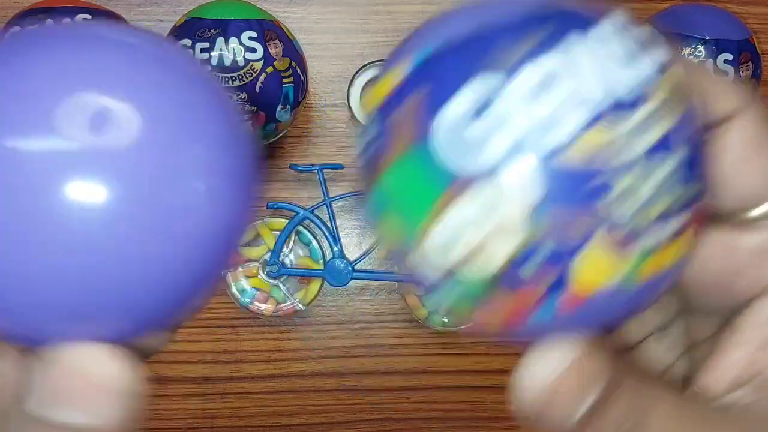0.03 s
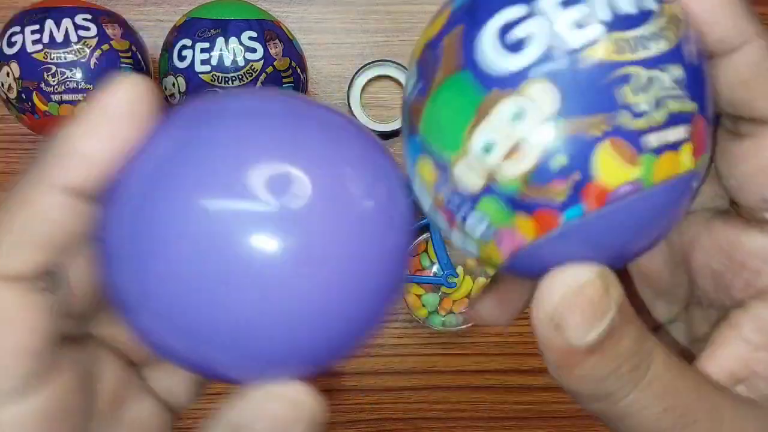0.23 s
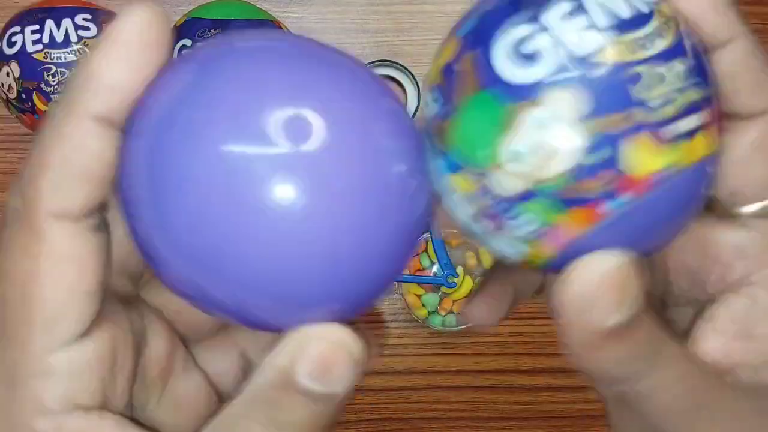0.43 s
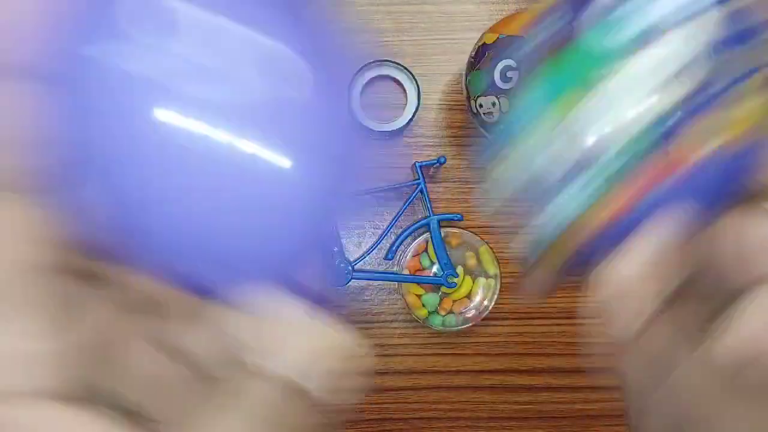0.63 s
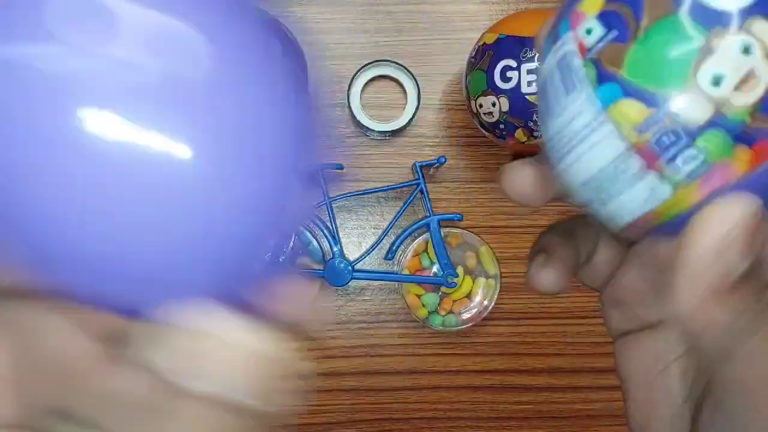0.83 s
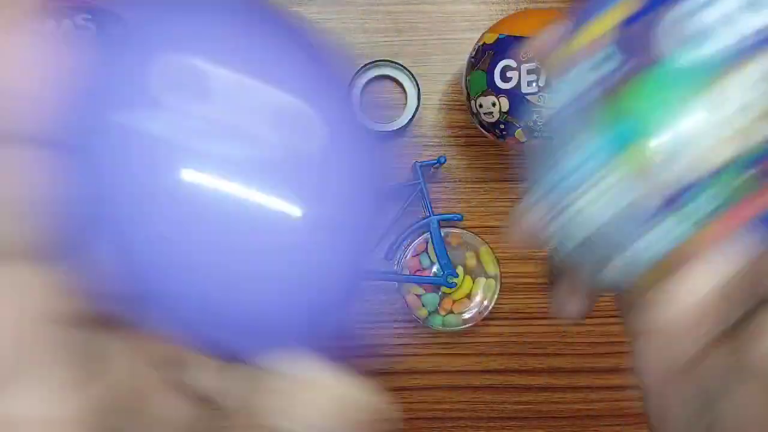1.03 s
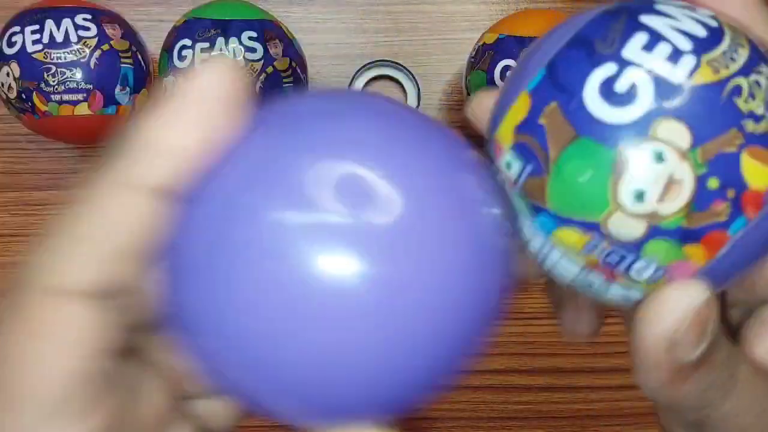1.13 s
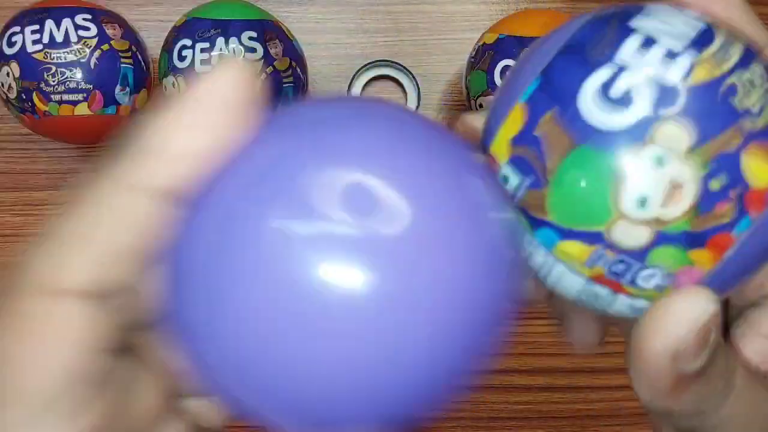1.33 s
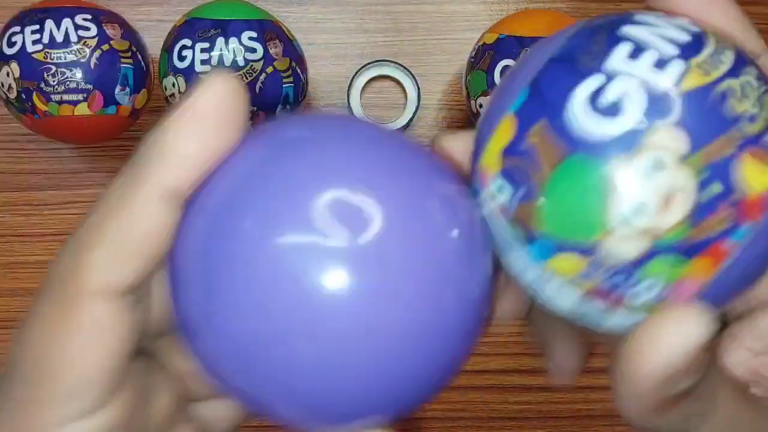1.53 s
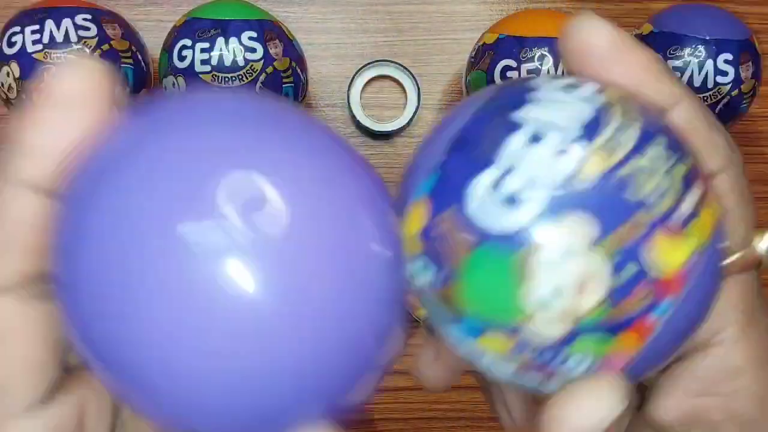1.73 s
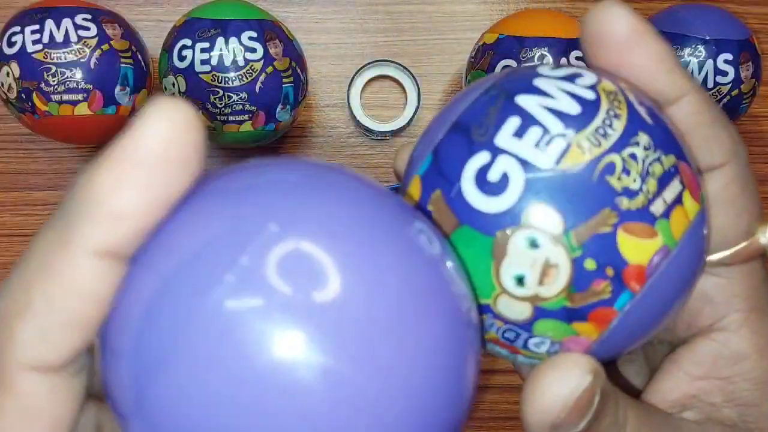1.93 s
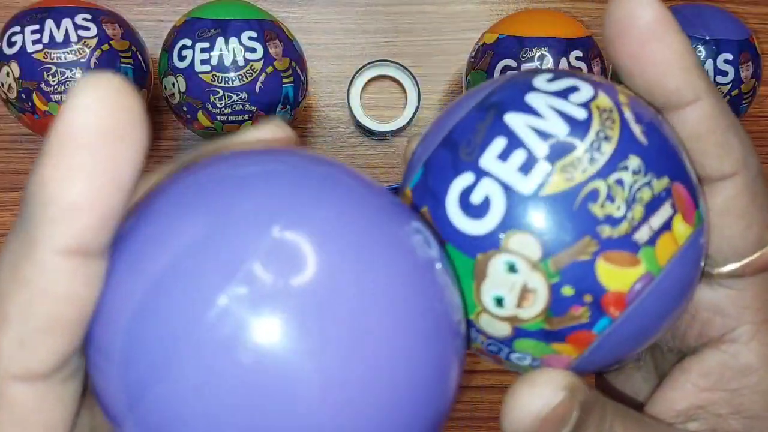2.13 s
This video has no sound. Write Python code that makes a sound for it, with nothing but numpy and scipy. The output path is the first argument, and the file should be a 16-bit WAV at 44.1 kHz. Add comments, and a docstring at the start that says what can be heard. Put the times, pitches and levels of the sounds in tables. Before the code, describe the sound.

Small candies rattle inside two hollow plastic balls shaken close to the microphone. The shaking starts lightly at about 0.2 seconds and keeps a quick, even pace for eight shakes, each a bright clatter against the shell followed by a hollow knock as the candies fall back. From about 1.9 seconds, single candies tick more and more faintly as they settle. The small quiet room adds a slight echo.

```python
"""Small candies rattle inside two hollow plastic balls, shaken eight times close to the microphone.
On each forward swing they spray against the shell, and every hit makes it ring briefly.
On the way back they land together with a knock and tumble to rest.
Single candies tick between the swings and at the end; a table top and a small quiet room echo it all."""
import sys
import numpy as np
from scipy import signal
from scipy.fft import rfft, irfft
from scipy.io import wavfile
from scipy.ndimage import uniform_filter1d

SR = 44100
rng = np.random.default_rng(int(sys.argv[2]) if len(sys.argv) > 2 else 0)


def wav_record(signal):
    """Record a signal, one row per channel, as 16-bit PCM in the file named by sys.argv[1]."""
    frames = np.transpose(np.atleast_2d(signal))
    bounded = np.clip(frames, -1, 1)
    # unit amplitude maps onto the largest positive 16-bit level
    quanta = np.round(bounded * 32767).astype(np.int16)
    wavfile.write(sys.argv[1], SR, quanta)


N = 97020


def shaken_candies(spots):
    """Candies spray forward, fall back, settle, and clink against each other."""
    # swings forward, swings back and small slides: start_s, peak_s, level_db, fade_db_per_s
    forward = [(0.224, 0.246, -27.5, 391.5), (0.434, 0.466, -16.5, 411.5), (0.672, 0.700, -15.5, 399.5),
               (0.897, 0.928, -14.5, 582), (1.116, 1.152, -14.5, 348), (1.332, 1.366, -14.5, 301),
               (1.531, 1.562, -16, 399), (1.768, 1.797, -17.5, 443.5)]
    back = [(0.286, 0.315, -17.5, 288.5), (0.521, 0.545, -20.5, 213.5), (0.746, 0.768, -20, 194),
            (0.965, 0.995, -18.5, 292.5), (1.179, 1.207, -21, 269), (1.390, 1.423, -17.5, 483),
            (1.604, 1.626, -18, 380.5), (1.827, 1.849, -18.5, 326.5)]
    settling = [(0.2, 0.216, -45.5, 392), (0.80, 0.822, -46, 503), (1.66, 1.68, -39.5, 408),
                (1.92, 1.933, -28, 399)]
    # tone of forward hits, backward hits and candy on candy: pitch_hz, level_db
    forward_tone = [(30, -39.5), (70, -36), (160, -16.5), (260, -13.5), (500, -13), (1000, -8), (1600, -5),
                    (2100, -1), (2600, 1), (4000, -0.5), (5500, -1.5), (7300, -13), (8700, -15.5),
                    (12000, -8), (15800, -29.5)]
    back_tone = [(30, -33), (60, -11), (120, -12), (250, -11.5), (500, -8.5), (1000, -6.5), (1700, -2.5),
                 (2200, -3.5), (2650, 0.5), (4000, 0), (5500, 1.5), (7500, -3), (8700, -12.5),
                 (12000, -9.5), (15800, -11)]
    clink_tone = [(1000, -30.5), (5000, -13), (7500, 1), (9000, -18), (12000, -10), (15500, -8)]
    return (spray(forward, spots, forward_tone, rise_db=13, thinning=0.41)
            + spray(back, spots, back_tone, rise_db=2.5, thinning=.3)
            + spray(settling, spots, back_tone, rise_db=5, thinning=1.0)
            + undb(-3) * spray(forward, spots, clink_tone, rise_db=12, thinning=1.0, hits_per_s=180))


def spray(swings, spots, colour, rise_db, thinning, hits_per_s=1200):
    """Clouds of candy hits build to a peak, then grow weaker, duller and sparser."""
    rest_db, dulling = -17, 0.79  # where a cloud stops; extra treble lost per dB below its peak
    t = np.arange(N) / SR
    body, treble = np.zeros((2, 2, N))
    for start, peak, db, fade in swings:
        jitter, place, side = rng.random((3, 400))
        strength = undb(4 * np.clip(rng.standard_normal(400), -2, 2))
        swell_db = np.where(t < peak, rise_db * (t - peak) / max(peak - start, .002), -fade * (t - peak))
        moving = (t >= start) & ((t < peak) | (swell_db > rest_db))
        rate = hits_per_s * undb(thinning * swell_db) * moving
        hits_so_far = np.cumsum(rate) / SR
        count = min(int(hits_so_far[-1]), len(strength))
        at = np.searchsorted(hits_so_far, np.arange(count) + jitter[:count])
        strength /= np.sqrt(np.mean(strength ** 2))
        gains = strength[:count] * undb(db + swell_db[at]) * np.sqrt(SR / rate[at])
        for i, gain, where, push in zip(at, gains, place, np.sign(side - .5)):
            hit = gain * push * spots[int(where * len(spots))]
            add(body, t[i], hit)
            add(treble, t[i], hit * undb(dulling * swell_db[i]))
    lowpass = signal.butter(1, 6700, fs=SR)  # lows come from body, highs from treble
    return convolve(treble + signal.lfilter(*lowpass, body - treble), tone(colour))


def shell_spots(count=48, size=2048):
    """Each spot on the shell gives a sharp click, its own ring and quick echoes off hands and table."""
    # the shell's ringing notes: pitch_hz, level_db, ring_s (time to fade by 60 dB)
    notes = [(1011, -32, 0.088), (1760, -14.5, .015), (2084, -13, 0.024), (2608, -2.5, 0.0126),
             (3260, -8.5, 0.0025), (3365, -13.5, 0.0173), (4475, -10, 0.015), (5225, 0.5, 0.0094),
             (6200, -11, 0.0052), (7220, 7, 0.012), (12270, 15, 0.0054)]
    t, freqs = np.arange(size) / SR, rfft_hz(size)
    spots = np.zeros((count, 2, size))
    spots[:, :, 0] = 1.6  # the click
    for hz, db, ring_s in notes:
        chance = rng.standard_normal((count, 4, 1))
        strength = chance[:, :1] + chance[:, 1:3]  # a shared part plus one for each ear
        spread = 0.081 * min(notes[3][2] / ring_s, 1) ** 2  # long notes vary less in pitch
        pitch = hz * (1 + spread * chance[:, 3:])
        spots += undb(db - 60 * t / ring_s) * strength * np.sin(2 * np.pi * pitch * t)
    spectrum = rfft(spots)
    power = np.mean(abs(spectrum) ** 2, axis=(0, 1))
    spectrum /= np.sqrt(uniform_filter1d(power, size=41))  # even out the overall tone
    right_lag_s = np.round((.0003 + .00005 * rng.uniform(-1, 1, (count, 1))) * SR) / SR
    spectrum[:, 1] *= np.exp(-2j * np.pi * freqs * right_lag_s)  # the left ear hears it first
    fade_out = np.cos(np.pi / 2 * t / t[-1]) ** 2
    spots = np.roll(irfft(spectrum), 24, axis=-1) * fade_out
    return [unit(unit(spot) + undb(-2) * tail(ring_s=0.017, size=size)) for spot in spots]


def knocks(spots):
    """The candies land in a lump: a crack, and a dull boom of the whole ball, damped by the hand."""
    # one landing on each swing back: time_s, boom_db, crack_db
    landings = [(0.2862, -4.5, -10.5), (0.521, -0.5, -9), (0.7465, -1, -2.5), (0.9655, -5, -3.5),
                (1.179, -4.5, -5.5), (1.390, -2.5, -15), (1.6043, 0.5, 3), (1.827, 1, 4.5)]
    # tone of the boom and of the crack: pitch_hz, level_db
    boom_tone = [(30, -7.5), (60, -15), (110, -8.5), (240, 1.5), (330, 0), (480, -14.5), (800, -9.5),
                 (2000, -17)]
    crack_tone = [(100, -11), (300, -1.5), (1000, 2.5), (2700, 4.5), (7000, -5.5), (9000, -9.5),
                  (16000, -16)]
    out = np.zeros((2, N))
    for spot, (at, boom_db, crack_db) in zip(spots, landings):
        middle, side = tail(ring_s=0.11)
        ring = middle + 0.22 * side * np.array([[1], [-1]])
        add(out, at, undb(boom_db - 1.5) * unit(convolve(ring, tone(boom_tone))))
        add(out, at, undb(crack_db + 7.5) * unit(convolve(spot, tone(crack_tone))))
    return out


def single_candies(spots):
    """Lone candies tick on the shell; harder contact gives more treble."""
    # lone hits: time_s, level_db, treble_db
    ticks = [(0.2182, -14.5, -4), (0.2331, -12.5, -31), (0.2458, -32, -14), (0.4288, -16, -41),
             (0.4393, -8.5, -28), (0.5954, -15, -20), (0.638, -18.5, -10), (0.6689, -12, -25),
             (0.6769, -6, -18), (0.8978, -8.5, -21.5), (1.0831, -12, -11), (1.1164, -16, -25),
             (1.3321, -19.5, -43), (1.5289, -21.5, -28), (1.7398, -18.5, -19), (1.7558, -18, -30),
             (1.7667, -14.5, -32), (1.778, -7, -16), (1.9333, -18.5, -23.5), (1.9646, -17.5, -28),
             (1.9952, -27.5, -17), (2.0456, -27, -38), (2.0627, -20, -13), (2.1164, -52.5, -28),
             (2.143, -31.5, -36), (2.1525, -40, -22), (2.175, -37, -42)]
    # tone of a typical tick: pitch_hz, level_db
    tick_tone = [(100, -44), (600, -36), (1400, -15), (2650, 0), (4000, -2), (7000, -9), (9000, -19),
                 (12000, -17), (16000, -27)]
    typical_treble_db = -13
    out = np.zeros((2, N))
    for k, (at, db, treble_db) in enumerate(ticks):
        tilt = [(3500, 0.0061), (10000, 0.73 * (treble_db - typical_treble_db))]
        colour = [(hz, level + on_log_axis(tilt, hz)) for hz, level in tick_tone]
        add(out, at, undb(db + 10.5) * unit(convolve(spots[k % len(spots)], tone(colour))))
    return out


def finger_bump():
    """A finger softly bumps the shell before the shaking."""
    # tone of the bump: pitch_hz, level_db
    bump_tone = [(30, -6), (60, 3), (130, 3), (250, -9.5), (500, -31), (1500, -34), (5000, -30),
                 (8000, -30), (16000, -48)]
    out = np.zeros((2, N))
    bump = unit(convolve(tail(ring_s=0.11), tone(bump_tone)))
    add(out, at_s=.122, sound=undb(-31) * bump)
    return out


def room_echo(sound, size=22050):
    """The small room gives a soft wash of echoes that dies sooner in the treble."""
    # time the room takes to fade by 60 dB: pitch_hz, ring_s
    ring_times = [(200, .28), (1400, .28), (3500, .3), (10000, .23), (16000, .16)]
    # tone of the echo: pitch_hz, level_db
    echo_tone = [(100, -4.5), (600, 0.5), (2700, -1), (7000, -0.5), (11000, 2.5), (16000, -0.5)]
    t = np.arange(size) / SR
    noise, echo = rfft(rng.standard_normal((2, size))), 0
    for band_hz, ring_s in ring_times:
        band = on_log_axis([(hz, hz == band_hz) for hz, _ in ring_times], rfft_hz(size))
        echo += irfft(noise * band) * undb(-60 * t / ring_s)
    fade_in = 1 - np.exp(-t / 0.0027)
    return convolve(convolve(sound, unit(echo * fade_in)), tone(echo_tone))


def background():
    """A steady low rumble with a little hiss."""
    # tone of the noise: pitch_hz, level_db
    noise_tone = [(30, -13), (60, -5), (130, -4), (300, -12.5), (700, -16), (2000, -26), (8000, -28),
                  (16000, -41)]
    return convolve(rng.standard_normal((2, N)), tone(noise_tone))


def undb(db):
    """Turn decibels into a gain."""
    return 10 ** (np.asarray(db) / 20)


def rfft_hz(size):
    """The pitch of each step in a spectrum."""
    return np.arange(size // 2 + 1) * SR / size


def on_log_axis(points, hz):
    """Read between (pitch_hz, value) points, giving each octave equal room."""
    pitches, values = np.array(points, float).T
    return np.interp(np.log(np.maximum(hz, 1)), np.log(pitches), values)


def unit(x):
    """Scale a sound so its channels have an average energy of one."""
    return x / np.sqrt(np.mean(np.sum(x ** 2, axis=-1)))


def convolve(x, response):
    """Pass a sound through a filter or an echo."""
    return signal.fftconvolve(np.atleast_2d(x), np.atleast_2d(response), axes=-1)[:, :N]


def tone(points, size=2048):
    """Make a filter with the shape of the (pitch_hz, level_db) points."""
    cepstrum = irfft(np.log(undb(on_log_axis(points, rfft_hz(size)))))
    cepstrum[1:size // 2] *= 2  # fold it so nothing sounds before the hit
    cepstrum[size // 2 + 1:] = 0
    return unit(irfft(np.exp(rfft(cepstrum))))


def tail(ring_s, size=8192):
    """Stereo noise that fades by 60 dB in ring_s."""
    return unit(rng.standard_normal((2, size)) * undb(-60 * np.arange(size) / SR / ring_s))


def add(out, at_s, sound):
    """Place a short sound at its time."""
    i = int(at_s * SR)
    out[:, i:i + sound.shape[1]] += sound[:, :N - i]


def scene():
    """The rattle, a little to the left, with the room and a faint background."""
    spots = shell_spots()
    rattle = shaken_candies(spots) + single_candies(spots) + knocks(spots) + finger_bump()
    echo = undb(-7.5) * room_echo(rattle)
    lean_left = np.array([[.5], [-.5]])
    return rattle * undb(6 * lean_left) + echo * undb(lean_left) + undb(-74.5) * background()


def record(dry):
    """The loudest peaks are rounded off and the highest treble is cut."""
    ceiling, top_hz = 1.1, 15750
    rounded = ceiling * np.tanh(dry / ceiling)
    return signal.sosfilt(signal.ellip(12, .1, 90, top_hz, fs=SR, output="sos"), rounded)


dry = scene()
out = record(dry)
wav_record(out)
```